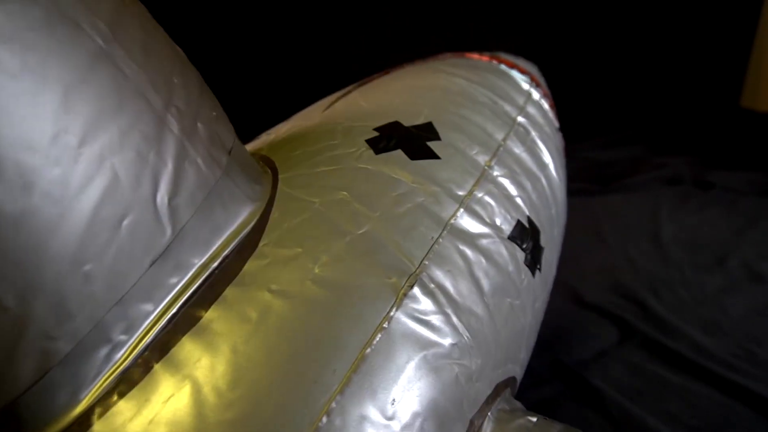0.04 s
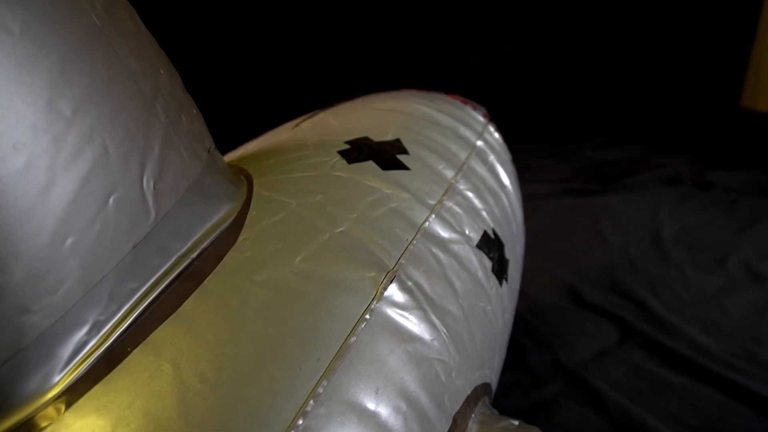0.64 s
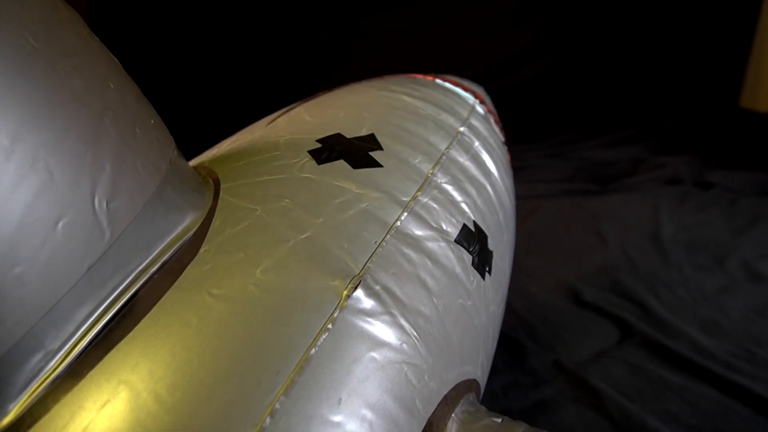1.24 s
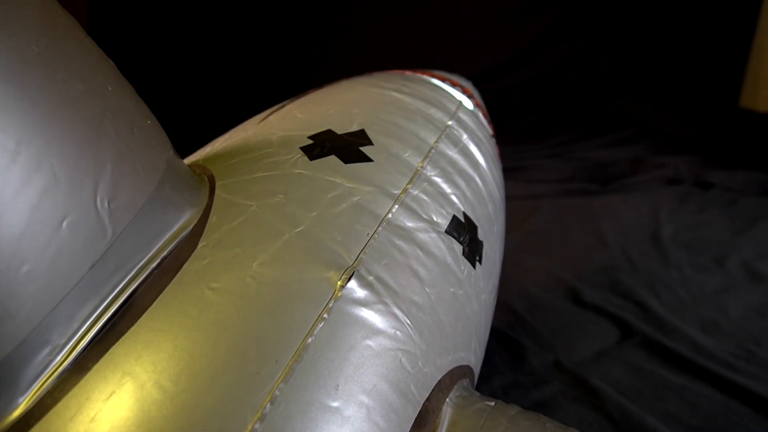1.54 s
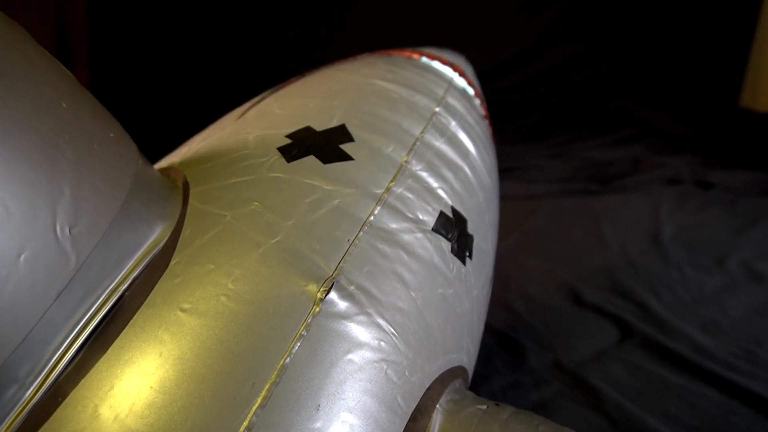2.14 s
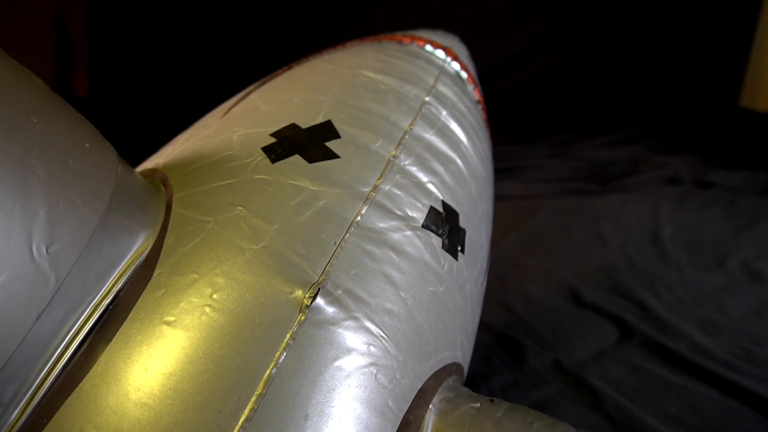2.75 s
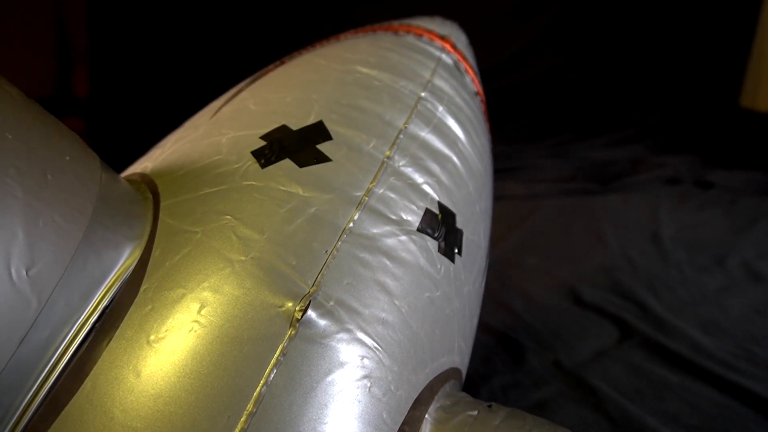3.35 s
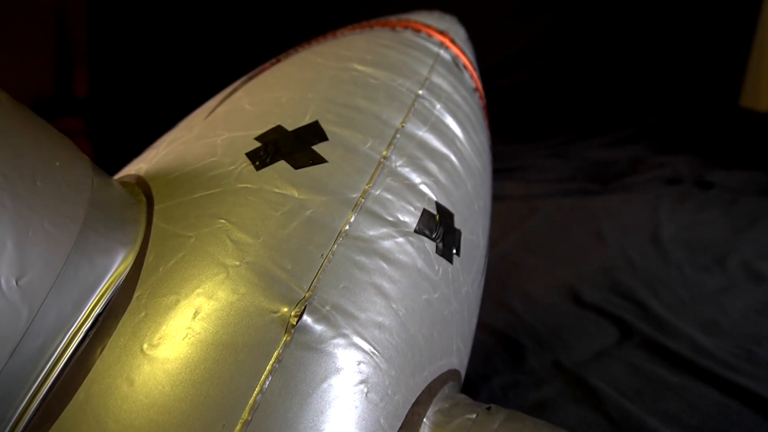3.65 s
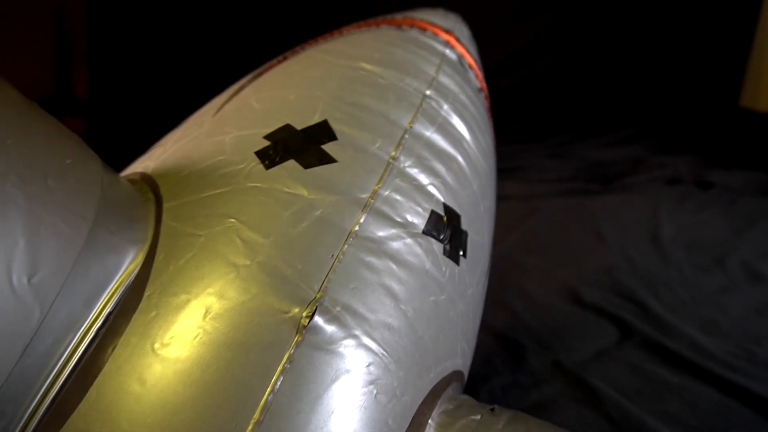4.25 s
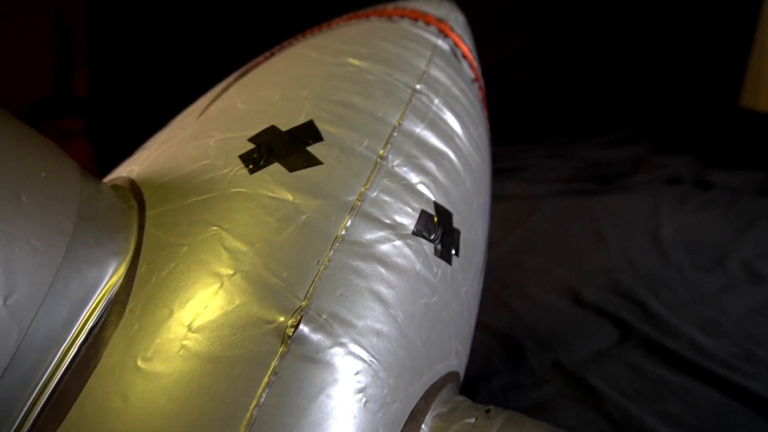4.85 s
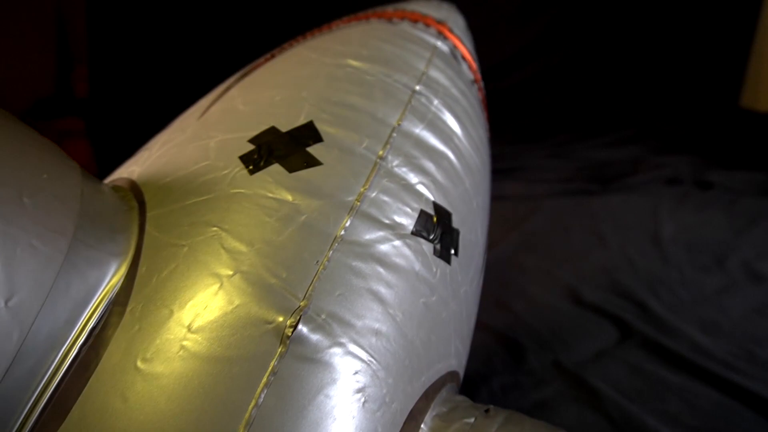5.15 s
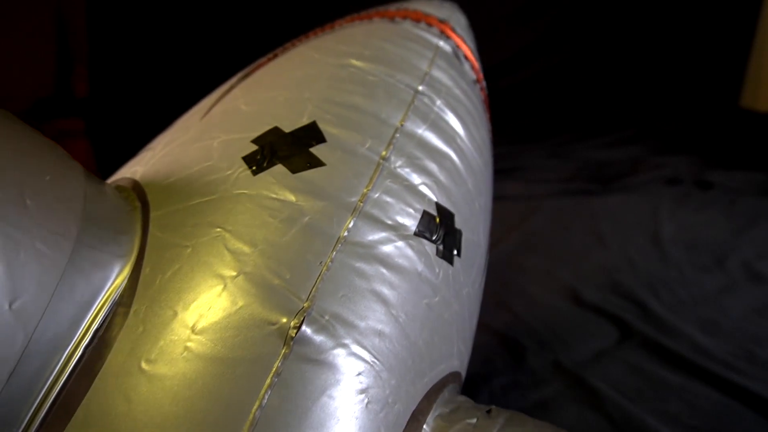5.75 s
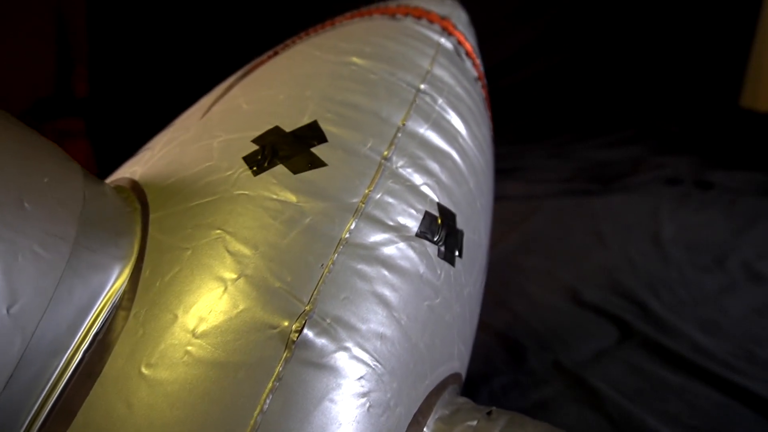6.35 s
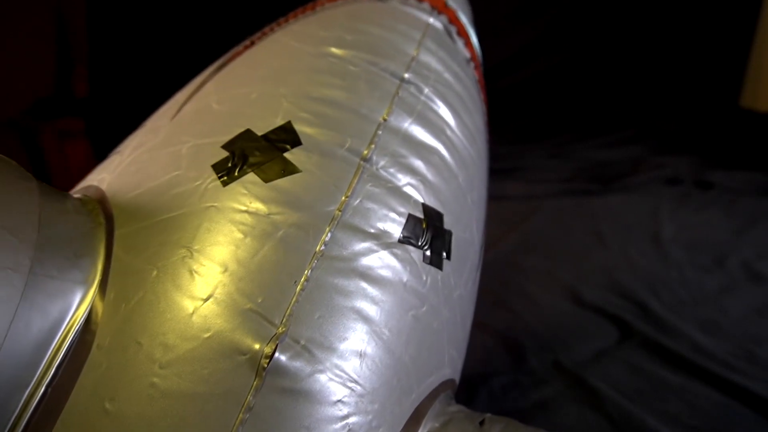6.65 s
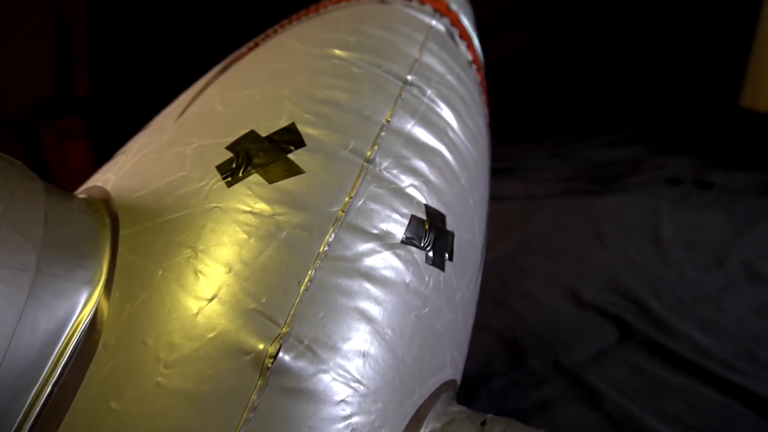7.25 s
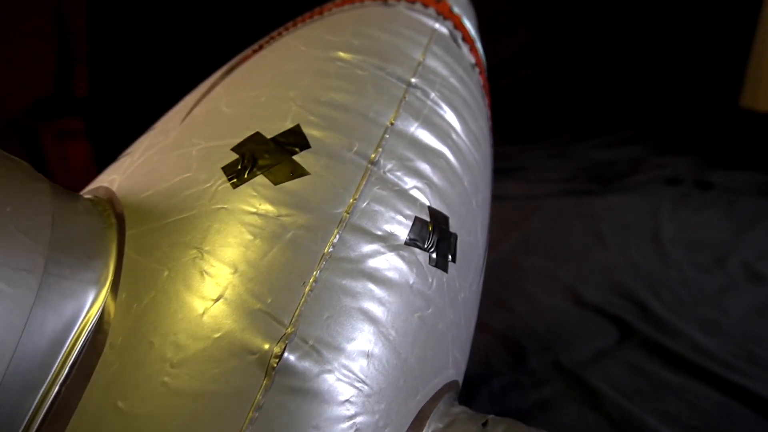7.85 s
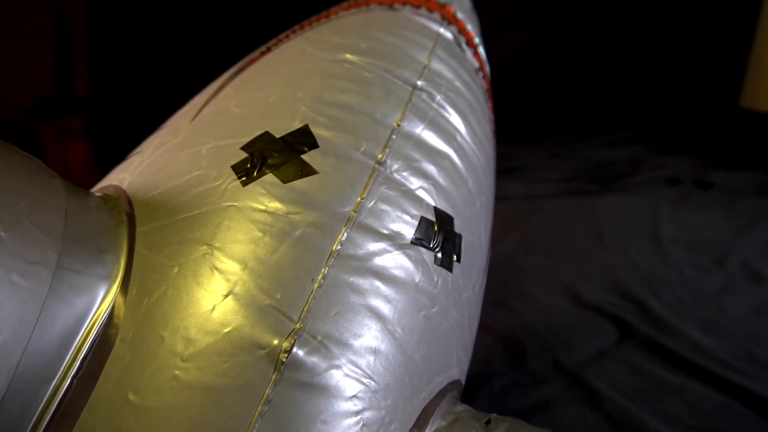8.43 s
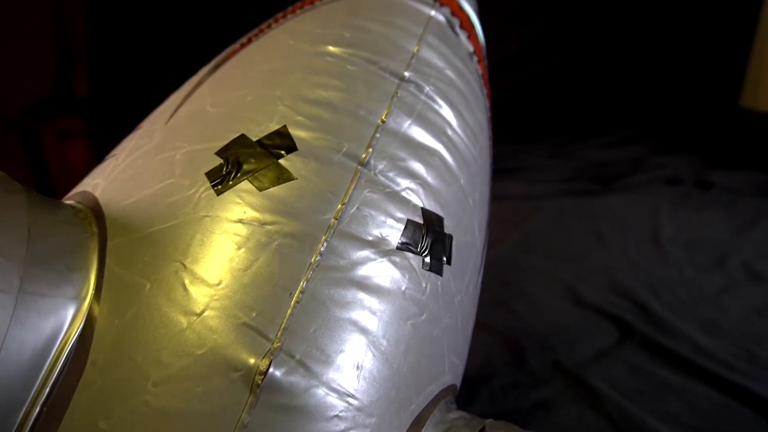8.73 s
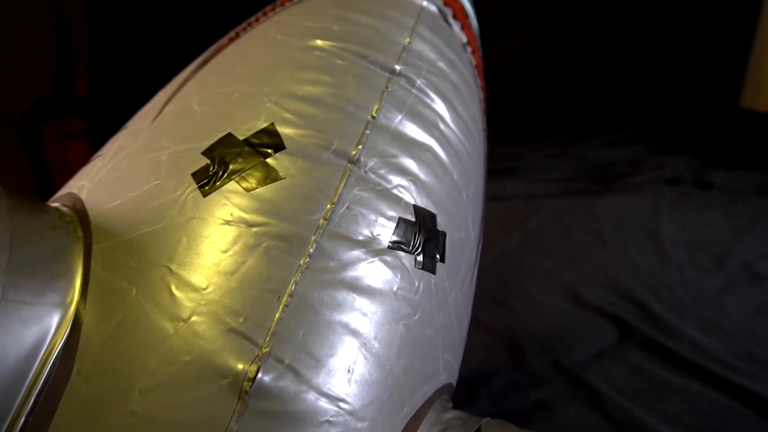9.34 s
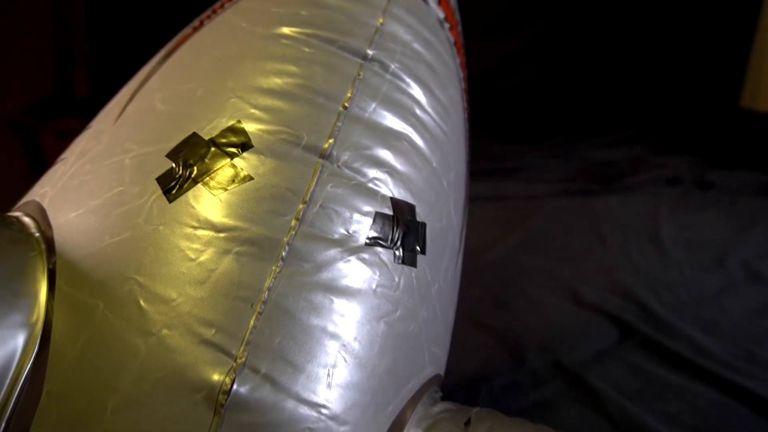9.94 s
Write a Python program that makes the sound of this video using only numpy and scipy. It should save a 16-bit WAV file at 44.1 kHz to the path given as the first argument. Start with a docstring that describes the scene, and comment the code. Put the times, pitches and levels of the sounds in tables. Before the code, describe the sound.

A big vinyl inflatable is pressed flat, close by and slightly to the left. A short spurt of air escapes right at the start, and the skin rubs, rustles and creaks, with a cluster of sharp, bright clicks around 0.4 to 0.7 seconds. At about 1 second come a stuttering creak, several pops and a thin, very high rising whistle. The hiss builds, becoming strong and steady by 2 seconds, and the rubbing fades out by 2.5. From about 4 seconds to the end at 10, the hiss pulses in waves roughly 0.7 seconds apart, its dips deepening, with a faint high whistle at the top of each push. Throughout, folds buckle in scattered dull pops that ring briefly inside, clearest between 5 and 7.5 seconds. A few short vinyl skids come in the later seconds, over a soft low rumble from the body.

```python
"""A big vinyl inflatable is pressed flat, close by. At first air spurts from a leak while the skin rubs,
creaks and ticks. After a second a thin whistle rises, and the hiss grows strong and steady as the rubbing
fades. From about four seconds the weight rocks, so the hiss comes in waves, with a whistle at the top of
each push. All along, folds buckle in dull pops that ring briefly in the air inside,
and the soft body rumbles."""
import sys
import numpy as np
from scipy import signal
from scipy.fft import rfft, irfft, next_fast_len
from scipy.io import wavfile

SR = 44100
rng = np.random.default_rng(int(sys.argv[2]) if len(sys.argv) > 2 else 0)


def transcribe(signal):
    """Save signal, clipped to [-1, 1], as a 16-bit WAV file at the path in sys.argv[1]."""
    frames = np.atleast_2d(signal).T
    limited = np.clip(frames, -1, 1)
    pcm = np.round(limited * 32767).astype(np.int16)
    wavfile.write(sys.argv[1], SR, pcm)


N = 440559
T = np.arange(N) / SR
FIRST_LIFT_S = 4.424  # when the rocking weight is first at its lightest

# the dull tone of vinyl catching on vinyl: pitch_hz, level_db
RUB_TONE = [(70, -15), (150, -0.5), (380, 1), (650, -4.5), (1300, -7), (2500, -16.5), (12000, -24)]


def leak():
    """Swirling air hisses out: the push sets its level and brightness, the opening's shape its tone."""
    # the air flow under the full weight: time_s, level_db
    flow = [(0, -48), (.05, -31.5), (.15, -30), (.18, -22.5), (.23, -28.5), (.262, -39), (.47, -43),
            (.86, -43.5), (1.21, -36.5), (1.47, -35), (1.85, -29.5), (2.6, -29.5), (4.15, -30.5),
            (5.4, -32), (7.2, -33.5), (8.8, -36), (9.4, -36.5), (9.98, -35)]
    # how loose the skin at the opening is: time_s, slackness (0 tight, 1 loose)
    slackness = [(0, 0.44), (1.2, 0.56), (1.9, 0.18), (3.6, 0.04), (4.8, 0.33), (6.5, 0.68), (9.99, 0.97)]
    # the tone of the hiss from a tight opening: pitch_hz, level_db
    tight_tone = [(100, -24.5), (1900, -11), (2700, -6), (3500, -3), (6400, 0), (7300, -1.5), (8500, 3.6),
                  (10200, -0.1), (12800, 4), (14300, 1.5), (16000, -3.5)]
    # the tone of the hiss from a loose opening: pitch_hz, level_db
    loose_tone = [(100, -9.5), (600, -3.5), (1500, -6), (2600, -3), (3300, 0.5), (5400, 2), (7100, 0.5),
                  (8400, 3.5), (9800, 1), (11200, 3.5), (12700, -0.5), (16000, 0.5)]
    flow_db, = curves(flow)
    dip_db = weight_lift() * (6.5 + 0.5 * (T - FIRST_LIFT_S))  # deeper dips as the body empties
    slack = np.clip(curves(slackness)[0], 0, 1)
    tight = unit(colour(stereo_noise(likeness=0.42), tight_tone))
    loose = unit(colour(stereo_noise(likeness=0.32), loose_tone))
    jet = np.sqrt(1 - slack) * tight + np.sqrt(slack) * loose
    # big swirls of air, below 7000 Hz, swell less with the push than the finest hiss does
    swirls = signal.sosfiltfilt(signal.butter(2, 7000, fs=SR, output="sos"), jet)
    swirl_db = -0.17 * (flow_db - flow_db.mean()) - 0.51 * dip_db
    low_hiss = delay_right(pan(swirls, left_db=0.6) * gain(swirl_db))
    fine_hiss = pan(jet - swirls, left_db=3.5) * gain(-dip_db)  # the microphone body shades the right
    return (low_hiss + fine_hiss) * gain(flow_db + 0.54 * wander(rate=45))


def weight_lift():
    """The weight rocks ever more slowly, then holds the last push: 0 is full push, 1 is lightest."""
    rocks, period_s, slowing_s = 8, 0.6353, 0.011
    cycle = np.linspace(-0.5, rocks - 0.5, 200)
    cycle_s = FIRST_LIFT_S + period_s * cycle + slowing_s * cycle ** 2 / 2
    return np.abs(np.cos(np.pi * np.interp(T, cycle_s, cycle))) ** 2.9


def whistles():
    """The lip of the leak sings; its pitch rises and sags with the pressure."""
    # the rising whistle as the leak opens: time_s, pitch_hz, level_db
    first_whistle = [(1.02, 13300, -68), (1.12, 13300, -42), (1.21, 12950, -36), (1.33, 13600, -39),
                     (1.52, 14600, -44), (1.65, 15000, -65)]
    # the later whistle at full push: time_s, pitch_hz, level_db
    push_whistle = [(4.3, 15700, -58), (5.12, 15900, -50), (5.22, 15800, -33), (5.33, 15600, -54),
                    (5.95, 15350, -53), (7.4, 15200, -45), (8.05, 15050, -45), (8.8, 14700, -48),
                    (9.5, 15000, -54), (9.65, 15100, -41), (9.98, 15050, -40)]
    first_hz, first_db = curves(first_whistle)
    sounding = (T > first_whistle[0][0]) * (T < first_whistle[-1][0])
    opening = airy_tone(first_hz) * gain(first_db) * sounding
    push_hz, push_db = curves(push_whistle)
    lift = weight_lift()
    sag_hz, waver_hz, fade_db = 3000, 139.7, 17
    rocking_hz = push_hz - sag_hz * lift + waver_hz * wander(rate=23)
    rocking = airy_tone(rocking_hz) * gain(push_db - fade_db * lift) * (T > push_whistle[0][0])
    return pan(opening + rocking, left_db=3)


def airy_tone(hz, width_hz=600):
    """Swirling air makes an unsteady note: a narrow band of noise around a moving pitch."""
    low_pass = signal.butter(2, width_hz / 2, fs=SR, output="sos")
    noise = stereo_noise(likeness=0.28) + 1j * stereo_noise(likeness=0.49)
    quiver = signal.sosfilt(low_pass, noise)
    return unit(np.real(quiver * np.exp(2j * np.pi * np.cumsum(hz) / SR)))  # move it up to the pitch


def pops():
    """Each fold gives a little, then buckles with a pop that echoes inside the body."""
    # single folds buckling: start_s, level_db, pitch_hz
    folds = [(.497, -35, 197), (.747, -34, 240), (.895, -32, 201), (1.096, -31.5, 304), (1.118, -29.5, 337),
             (1.155, -30.5, 363), (1.176, -31.5, 270), (1.207, -28.5, 277), (1.276, -26.5, 230),
             (1.352, -31.5, 290), (1.519, -36.5, 437), (2.049, -30, 420), (2.156, -34.5, 701),
             (2.234, -27, 364), (2.274, -36, 406), (2.286, -34.5, 370), (2.358, -32.5, 395),
             (2.429, -34, 375), (2.451, -28.5, 236), (2.52, -32.5, 420), (2.702, -31, 507),
             (2.842, -39.5, 400), (2.877, -36, 420), (2.902, -36, 636), (2.943, -34, 304),
             (3.174, -33, 450), (3.240, -35, 510), (3.245, -33.5, 380), (3.343, -45.5, 430),
             (3.475, -45.5, 400), (3.53, -33, 400), (3.692, -30, 400), (3.923, -35, 330), (4.008, -27, 394),
             (4.081, -28.5, 403), (4.355, -44.5, 470), (4.599, -30.5, 340), (4.646, -30, 526),
             (4.816, -37.5, 810), (4.97, -42.5, 468), (5.3, -26, 440), (5.361, -26.5, 416),
             (5.932, -28.5, 467), (6.044, -43, 460), (6.315, -43.5, 695), (6.588, -25, 453),
             (6.671, -25, 425), (6.908, -47, 890), (7.178, -51.5, 950), (7.38, -22.5, 400),
             (7.585, -45, 1000), (7.649, -39, 427), (7.939, -45.5, 620), (8.038, -41.5, 890),
             (8.291, -44, 910), (8.756, -42.5, 794), (9.013, -43, 975), (9.029, -41, 824),
             (9.48, -42.5, 340), (9.561, -40.5, 370), (9.885, -39.5, 368), (9.98, -38.5, 680)]
    out = np.zeros((2, N))
    for start_s, db, hz in folds:
        echo_db = np.interp(start_s, [1.2, 3.0], [-43, -37])  # a looser body echoes more freely
        add(out, start_s, inner_echo(buckle(hz), echo_db) * gain(db))
        give = crack(2.7 * hz) + 0.38 * swing(hz)
        early_s = 0.003025 * rng.uniform(0.754, 1.326)
        add(out, start_s - early_s, give * gain(min(db - 20, -38.5)))
    return out


def buckle(hz):
    """A fold swings and cracks, catches, then cracks again more brightly as it lets go."""
    crack_gain = gain(-4.5 + 7 * np.log2(hz / 400))  # a small, high patch of skin cracks louder
    out = np.zeros(2048)
    add(out, 0, swing(hz) + crack_gain * crack(11.0 * hz))
    caught_s = 0.003 * rng.uniform(0.803, 1.4)
    add(out, caught_s, 0.18 * swing(hz) + crack_gain * gain(-5.5) * crack(21.6 * hz))
    return out


def swing(hz):
    """A patch of skin flips over in one swing that dies at once."""
    cycles = hz * T[:1024]
    turn = resonate(cycles * np.exp(-cycles / 0.083), hz, q=1.0)  # big patches turn over slowly
    return unit(resonate(turn, hz, q=0.23))  # and give off little sound below their pitch


def crack(top_hz):
    """The gritty crack of a fold, dull above top_hz."""
    # the tone of the crack: pitch_hz, level_db
    crack_tone = [(200, -4.5), (700, -1.5), (1050, 9), (1700, 2.5), (3100, 2), (4400, -3), (6000, 0),
                  (16000, -3)]
    t = T[:1024]
    fade = np.exp(-t / 0.00074) + 0.27 * np.exp(-t / 0.0014)
    grit = (t == 0) + 0.26 * rng.standard_normal(len(t)) * fade
    low_pass = signal.butter(3, min(top_hz, SR / 3), fs=SR, output="sos")
    return unit(signal.sosfilt(low_pass, colour(grit, crack_tone)))


def rubbing():
    """Vinyl drags over vinyl: returns the dull grains of its tiny slips, and a dry rustle."""
    # skin sliding on skin: time_s, grain_db, rustle_db
    rub_levels = [(0, -43, -38), (.22, -39, -38.5), (.47, -46, -39.5), (.66, -38, -39), (.85, -38.5, -42.5),
                  (1.12, -38, -40.5), (1.35, -34.5, -40.5), (1.7, -36, -39), (2.0, -35.5, -41),
                  (2.3, -44.5, -51), (2.65, -54, -76), (5.1, -70, -69)]
    # the tone of the rustle: pitch_hz, level_db
    rustle_tone = [(300, -31), (1200, 2.5), (2700, 7), (4200, 2), (6200, 2.5), (9000, 0), (16000, -29)]
    grain_db, rustle_db = curves(rub_levels)
    grains = unit(colour(slips(rate=1000, spread_db=4.5), RUB_TONE))
    flickering = stereo_noise(likeness=0.16) * gain(2.4 * wander(rate=210))
    rustle = unit(colour(flickering, rustle_tone))
    return grains * gain(grain_db), pan(rustle * gain(rustle_db), left_db=3.0)


def ticks():
    """Tight creases flick over with a bright, very short ring."""
    # sharp creases: start_s, peak_db, pitch_hz
    creases = [(0.177, -18, 2770), (0.371, -9.5, 5900), (.532, 2.5, 6080), (.544, -16, 2770),
               (.589, -8, 6300), (.5892, -16, 13500), (0.592, -21, 9000), (0.6261, -9, 2700),
               (0.646, -13, 6460), (1.094, -15, 6046), (8.292, -21, 9200), (9.013, -18, 9100)]
    out, t = np.zeros((2, N)), T[:1024]
    fade = np.exp(-t / 0.00043) + 0.065 * np.exp(-t / 0.011)
    for start_s, db, hz in creases:
        flick = stereo_noise(likeness=0.15, size=len(t)) * fade
        ring = np.sin(2 * np.pi * hz * t) * np.exp(-hz * t / 3.8)
        tick = resonate(resonate(flick, hz, q=0.98), hz, q=0.38) + 0.41 * ring
        add(out, start_s, tick / np.abs(tick).max() * gain(db))
    return out


def creaks():
    """Tight skin sticks and slips: a run of dull pops with widening gaps, over a grainy drag."""
    # runs of slips: start_s, length_s, first_gap_s, level_db, pitch_hz
    runs = [(0.278, 0.12, 0.036, -39.5, 180), (0.913, .156, .0174, -26.5, 232.2),
            (1.887, 0.15, .0136, -33.5, 435), (2.127, .08, 0.033, -33.5, 410)]
    gap_growth, jitter_s = 1.036, 0.00055
    out = np.zeros(N)
    for start_s, length_s, gap_s, db, hz in runs:
        times = np.append(0, np.cumsum(gap_s * gap_growth ** np.arange(20)))
        for offset_s in times[times < length_s]:
            slip_hz = hz * 2 ** (0.25 * rng.standard_normal())
            slip = swing(slip_hz) + gain(-7) * crack(8.1 * hz)
            slip_s = start_s + offset_s + jitter_s * rng.standard_normal()
            add(out, slip_s, slip * gain(db + 1.04 * rng.standard_normal()))
        size = int(length_s * SR)
        drag = unit(colour(slips(rate=1500, spread_db=1.0, size=size), RUB_TONE))
        add(out, start_s - gap_s, drag * signal.windows.tukey(size, 0.2) * gain(db - 7))
    return out


def skids():
    """A fold lets go and slides: tiny slips swell and die away; fast, high skids hiss more."""
    # short slides of the skin: start_s, length_s, level_db, pitch_hz
    slides = [(0.16, 0.065, -30, 2270), (0.517, 0.026, -30, 6000), (0.593, 0.1, -38, 4470),
              (4.268, 0.086, -40.5, 415), (5.639, 0.059, -41, 423), (6.302, 0.069, -39, 900),
              (7.651, 0.077, -44.5, 597), (6.88, 0.26, -48, 450), (7.971, 0.07, -41, 415),
              (8.306, 0.085, -41, 950), (8.679, 0.08, -35, 330), (9.221, 0.055, -25.5, 1570),
              (9.287, 0.17, -42.5, 1370), (9.861, 0.16, -40.5, 480)]
    out = np.zeros(N)
    for start_s, length_s, db, hz in slides:
        progress = np.linspace(0, 1, int(length_s * SR))
        swell = progress * np.exp(-progress / 0.39) * (1 - progress)
        grains = unit(resonate(slips(rate=2500, spread_db=4.0, size=len(swell)), hz, q=0.67))
        hiss = rng.standard_normal(len(swell)) * min(hz, 2000) / 6000
        add(out, start_s, (grains + hiss) * swell / swell.max() * gain(db))
    return out


def crinkles():
    """Tiny folds give way at random, louder while the weight bears down."""
    return unit(colour(slips(rate=13, spread_db=1.5), RUB_TONE)) * gain(-59 - 2.7 * weight_lift())


def inner_echo(sound, echo_db):
    """A sound plus its scatter inside the body; each spot on the skin has its own echo pattern."""
    # the tone of the echo: pitch_hz, level_db
    echo_tone = [(60, -10), (200, -8.5), (500, -2.5), (1100, 2), (3000, 5.5), (16000, 0)]
    t = T[:7000]
    centre, side = rng.standard_normal((2, len(t)))
    high_pass = signal.butter(1, 1400, "high", fs=SR, output="sos")
    side = np.array([[1], [-1]]) * signal.sosfilt(high_pass, side)  # wide only in the treble
    onset = np.clip((t - 0.002) / 0.0021, 0, 1)
    fade = gain(-60 * t / 0.29) + gain(-60 * t / 0.11)
    response = colour(centre + side, echo_tone) * onset * fade * gain(echo_db)
    response[:, 0] += 1  # the direct sound
    return signal.fftconvolve(sound[None], response, axes=1)[:, :N]


def air_chamber(skin):
    """The skin makes the air inside ring faintly at a few low notes."""
    # the notes of the trapped air: pitch_hz, level_db, ring_s (time to fade by 60 dB)
    notes = [(131.7, 9, 0.14), (207.5, 2.5, 0.22), (305, 0, 0.14), (391.6, -13.5, 0.42), (582, 6.5, 0.077)]
    t = T[:16384]
    ring = sum(gain(db - 60 * t / ring_s) * np.sin(2 * np.pi * hz * t) for hz, db, ring_s in notes)
    return gain(-59.0) * signal.fftconvolve(skin, ring)[:N]


def wobble():
    """The soft body rumbles, the same on both sides, calmer as the weight lifts."""
    # the body wobbling under the weight: time_s, level_db
    wobble_levels = [(0, -47), (1.1, -43.5), (1.4, -61), (2.3, -54), (2.7, -61), (4.3, -53), (5.7, -60.5),
                     (7.3, -56), (8.7, -56), (9.2, -53), (9.9, -62)]
    # the tone of the rumble: pitch_hz, level_db
    rumble_tone = [(20, -28), (54, -2.5), (75, -3.5), (125, -3.5), (200, -8.5), (1200, -35.5)]
    db = curves(wobble_levels)[0] - 4 * weight_lift() + 2.1 * wander(rate=56)
    return unit(colour(rng.standard_normal(N), rumble_tone)) * gain(db)


def gain(db):
    """Turn decibels into a multiplier."""
    return 10 ** (np.asarray(db) / 20)


def unit(x):
    """Scale a sound to an average strength (rms) of 1."""
    return x / np.sqrt(np.mean(x ** 2))


def curves(rows):
    """Turn each column after a table's times into one value per sample."""
    times, *columns = np.transpose(rows)
    return [np.interp(T, times, column) for column in columns]


def colour(x, tone):
    """Filter a sound to follow a table of pitch_hz, level_db."""
    size = next_fast_len(x.shape[-1] + 4096)
    size += size % 2
    hz, db = np.transpose(tone)
    grid_hz = np.maximum(np.arange(size // 2 + 1) * SR / size, 1)
    cepstrum = irfft(np.log(gain(np.interp(np.log(grid_hz), np.log(hz), db))))
    # fold the second half onto the first, so the filter never rings ahead of the sound
    cepstrum[1:size // 2] *= 2
    cepstrum[size // 2 + 1:] = 0
    return irfft(rfft(x, size) * np.exp(rfft(cepstrum)))[..., :x.shape[-1]]


def resonate(x, hz, q):
    """Keep the band around one pitch; a higher q makes it narrower."""
    angle = 2 * np.pi * min(hz, SR / 2 - 1) / SR
    width = np.sin(angle) / (2 * q)
    return signal.lfilter([width, 0, -width], [1 + width, -2 * np.cos(angle), 1 - width], x)


def wander(rate):
    """A random drift of about 1 either way, turning `rate` times a second."""
    points = rng.standard_normal(int(N / SR * rate) + 2)
    return unit(np.interp(T * rate, np.arange(len(points)), points))


def stereo_noise(likeness, size=N):
    """Left and right noise: likeness 0 is unrelated, 1 is the same."""
    noise = rng.standard_normal((3, size))
    return np.sqrt(likeness) * noise[0] + np.sqrt(1 - likeness) * noise[1:]


def slips(rate, spread_db, size=N):
    """Skin catches and lets go: uneven random clicks, about `rate` a second."""
    hit = rng.random(size) < rate / SR
    strength = gain(spread_db * np.minimum(rng.exponential(size=size), 4))
    return hit * strength * rng.choice([-1, 1], size)


def pan(x, left_db):
    """Lean a sound to the left."""
    return x * gain(np.array([[left_db], [-left_db]]) / 2)


def delay_right(x, delay_s=2.2e-5):
    """The sound reaches the right microphone a little later."""
    phase = 2 * np.pi * np.arange(N // 2 + 1) * SR / N * delay_s
    return np.array([x[0], irfft(rfft(x[1]) * np.exp(-1j * phase), N)])


def add(track, start_s, sound):
    """Mix a sound into a track at start_s."""
    first = max(int(start_s * SR), 0)
    part = sound[..., :max(N - first, 0)]
    track[..., first:first + part.shape[-1]] += part


def scene():
    """Leak and skin lie slightly to the left, over the rumble of the soft body."""
    grains, rustle = rubbing()
    skin = pops() + inner_echo(grains + creaks() + crinkles() + skids(), echo_db=-42)
    body = skin + air_chamber(skin.mean(axis=0))
    # the microphone body shades the right side at middle pitches
    body = body + np.array([[1], [-1]]) * 0.21 * resonate(body, 1320, q=1.0)
    return leak() + whistles() + delay_right(body + rustle) + ticks() + wobble()


def record(dry):
    """Cut the highest treble, above 15750 Hz."""
    return signal.sosfilt(signal.ellip(10, 0.2, 70, 15750, fs=SR, output="sos"), dry)


dry = scene()
out = record(dry)
transcribe(out)
```